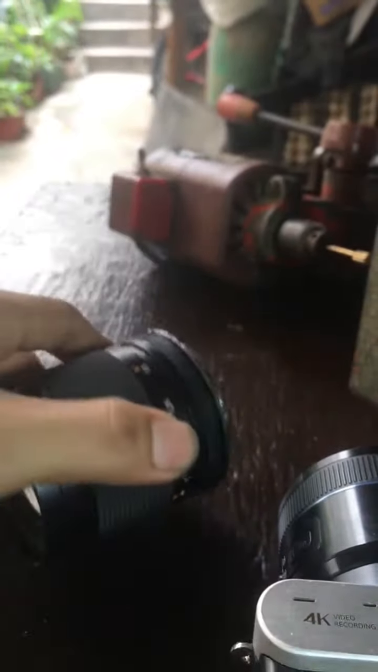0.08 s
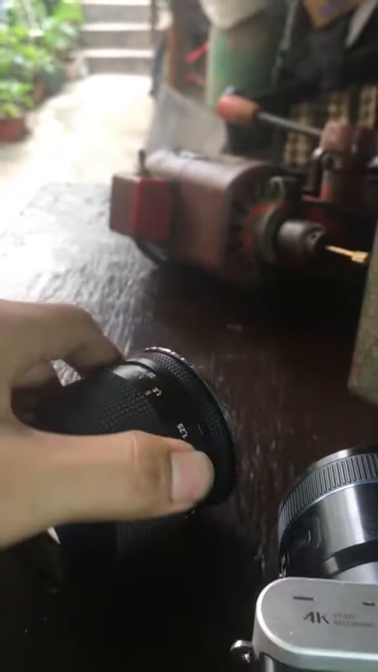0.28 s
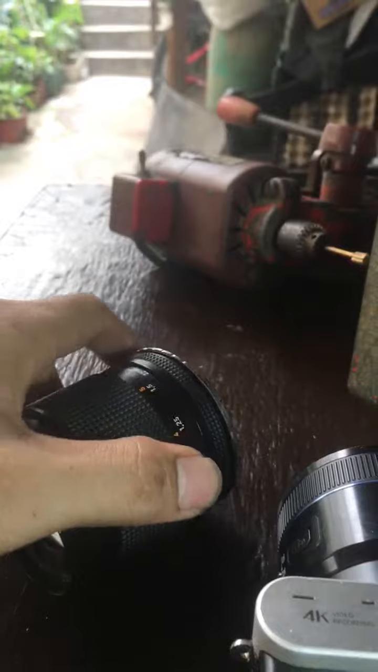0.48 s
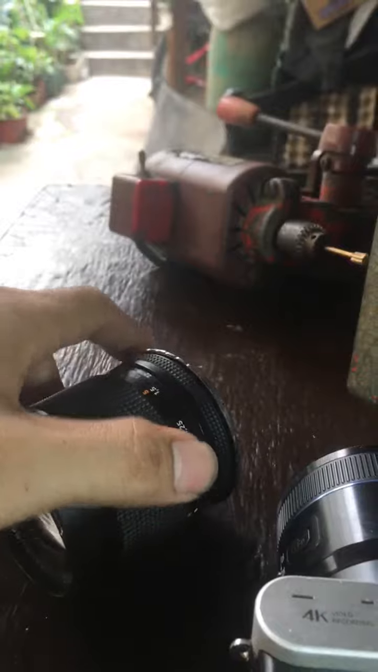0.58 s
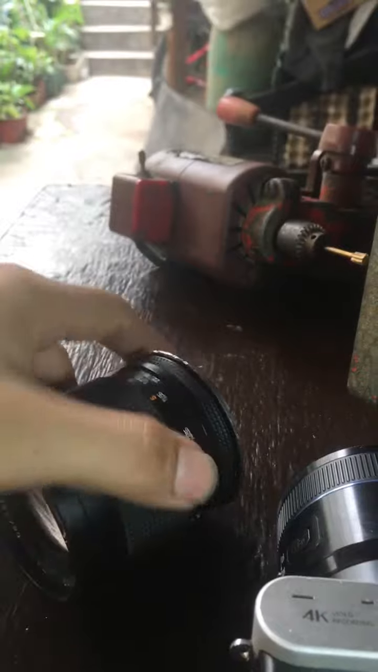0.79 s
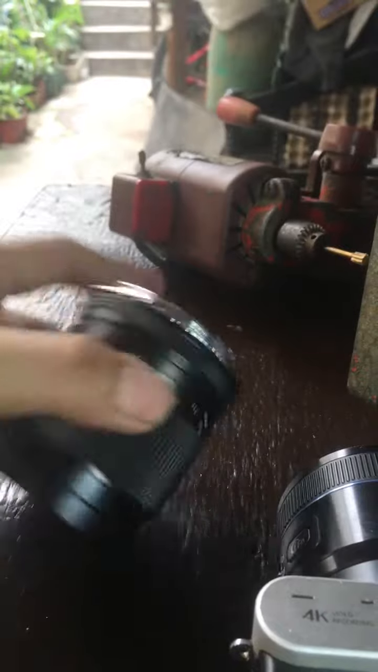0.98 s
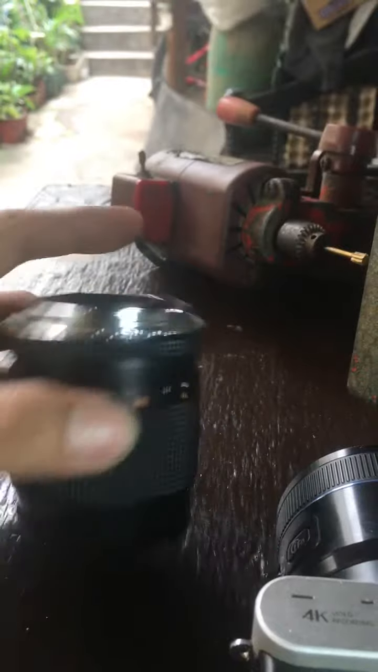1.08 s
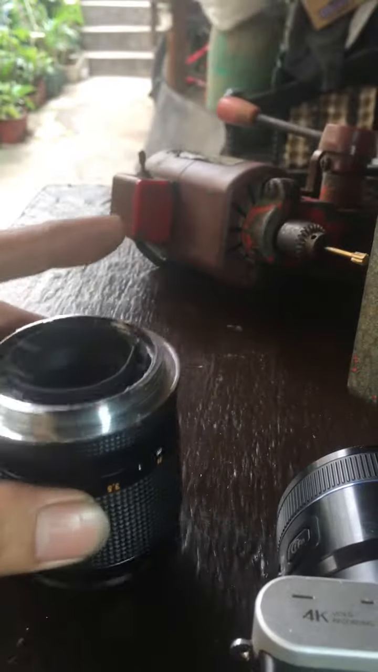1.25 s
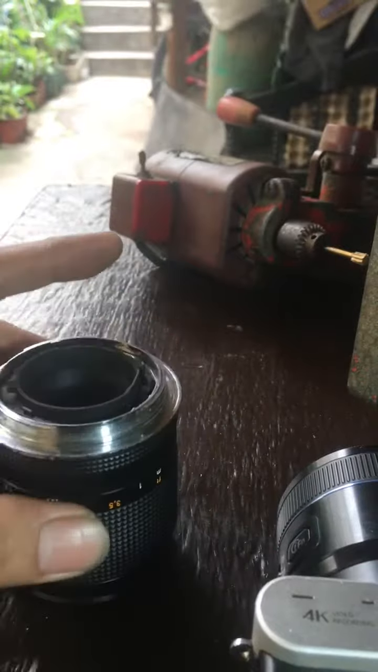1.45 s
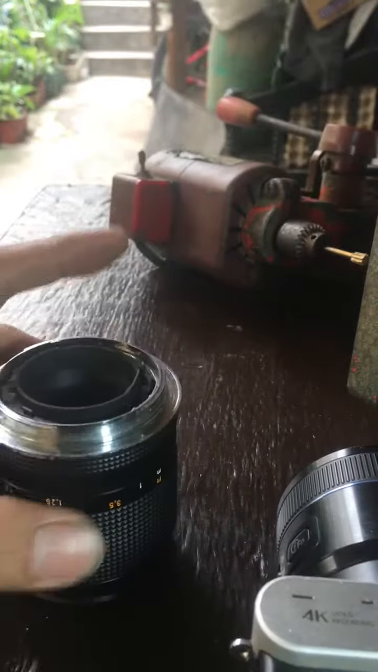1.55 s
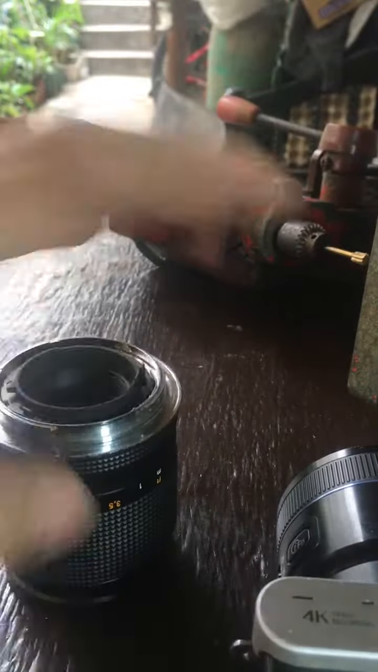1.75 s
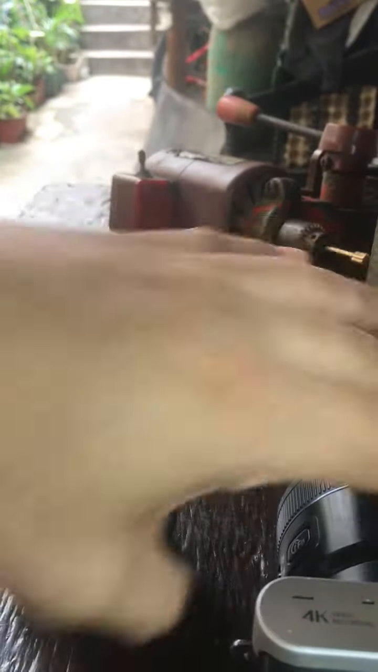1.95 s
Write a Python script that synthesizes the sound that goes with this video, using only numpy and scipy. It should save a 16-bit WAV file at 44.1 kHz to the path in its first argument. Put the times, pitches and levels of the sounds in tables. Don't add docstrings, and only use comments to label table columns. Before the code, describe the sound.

A heavy camera lens knocks down on a thick wooden bench, first farther away, then nearer, with metallic rim clacks and soft hand thumps, over low rumble, hiss and faint pulsing whine, close microphone on the bench.

```python
import sys
import numpy as np
from scipy import signal
from scipy.fft import rfft, irfft
from scipy.io import wavfile
from scipy.ndimage import uniform_filter1d

SR = 44100
rng = np.random.default_rng(int(sys.argv[2]) if len(sys.argv) > 2 else 0)


def wrap_up_sound(samples):
    columns = np.atleast_2d(samples).T
    tamed = np.clip(columns, -1, 1)
    steps = np.round(tamed * 32767).astype(np.int16)
    wavfile.write(sys.argv[1], SR, steps)


def invert_db(x):
    u = np.asarray(x, float) / 20
    return 10 ** u


N = 88200


def read(points, hz):
    f, value = np.transpose(points)
    return np.interp(np.log(hz + 1), np.log(f + 1), value, left=-90, right=-90)


def noise(colour, size, patchy_db=0.):
    hz = np.fft.rfftfreq(size, 1 / SR)
    frames = N // (size // 4) + 5
    real, imaginary, patches = rng.standard_normal((frames, len(hz), 3)).T
    patches = uniform_filter1d(patches, size=9, axis=0)
    patches = uniform_filter1d(patches, size=7, axis=1)
    level_db = read(colour, hz)[:, None] + patchy_db * patches / patches.std()
    spectrum = (real + 1j * imaginary) * invert_db(level_db)
    x = signal.istft(spectrum, nperseg=size, noverlap=size * 3 // 4)[1][:N]
    return x / x.std()


def room():
    # (frequency [Hz], level per Hz [dB])
    rumble_colour = [(20, -21.5), (40, -12), (55, -10), (72, -2), (92, -15.5), (113, -7), (140, -15.5),
                     (190, -22.5)]
    # (frequency [Hz], level per Hz [dB])
    murmur_colour = [(88, -35), (150, -0.5), (367, -7), (401, -15), (438, -2), (485, -10.5), (522, -14.5),
                     (1690, -17), (5000, -40.5), (6500, -71.5), (11000, -120)]
    # (frequency [Hz], level per Hz [dB])
    hiss_colour = [(4000, -4), (4900, -10), (6000, -2.5), (7600, -10.5), (8800, 0), (10200, -10.5),
                   (11500, -3.5), (14000, -9), (15900, -10)]
    rumble = invert_db(-44) * noise(rumble_colour, size=8192)
    murmur = invert_db(-54) * noise(murmur_colour, size=1024, patchy_db=1.5)
    hiss = invert_db(-73) * noise(hiss_colour, size=512, patchy_db=.6)
    return rumble + murmur + hiss


def whine():
    # (multiple of the base pitch [-], level [dB])
    harmonics = [(1, -80), (2, -97), (3, -79.5), (4, -80.5), (5, -85.5)]
    base_hz = 3073
    period_s, pause_s, first_pause_s = .3225, .036, .268
    t = np.arange(N) / SR
    from_pause_s = abs((t - first_pause_s + period_s / 2) % period_s - period_s / 2)
    gate = np.clip((from_pause_s - pause_s / 2) / .003, 0, 1)
    drift = uniform_filter1d(rng.standard_normal(N), size=3000)
    turns = np.cumsum(base_hz * (1 + .0005 * drift / drift.std())) / SR
    buzz = sum(invert_db(db) * np.sin(2 * np.pi * round(k) * turns) for k, db in harmonics)
    return gate * 2 ** .5 * buzz


def thumps():
    # (time [s], level [dB], first pitch [Hz], last pitch [Hz], length [s])
    hand = [
        (0.044, -35, 96, 84, 0.035),
        (0.096, -35, 97, 80.5, 0.028),
        (0.787, -38.5, 83, 80, 0.032),
        (1.342, -36, 49.7, 41.6, 0.051),
        (1.747, -43.5, 243, 226, 0.018),
        (1.765, -34.5, 79, 94, 0.037),
        (1.983, -34, 85, 78, 0.047),
    ]
    firm = [
        (1.9035, -25, 140, 58, .03),
        (1.9275, -24, 86, 76, .036),
        (1.328, -35, 330, 250, .005),
        (1.334, -33, 420, 300, .006),
    ]
    out = np.zeros(N + SR)
    for s, db, first_hz, last_hz, length in [*hand, *firm]:
        u = np.arange(0, 1, 1 / (length * SR))
        hz = last_hz + (first_hz - last_hz) * (1 - u) ** 2
        swell = np.sin(np.pi * u ** .7)
        out[round(s * SR):][:len(u)] -= invert_db(db) * swell * np.sin(2 * np.pi * np.cumsum(hz) / SR)
    return out[:N]


def crackles():
    # (time [s], level [dB])
    ticks = [(0.13, -53.5), (0.2324, -50), (0.4366, -64), (0.5692, -53), (0.5978, -54), (0.6988, -65),
             (0.7445, -54.5), (0.8933, -49.5), (0.9308, -66.5), (1.0515, -55), (1.171, -52.5),
             (1.2141, -53.5), (1.257, -66), (1.3808, -52), (1.534, -51), (1.5623, -53.5), (1.6663, -47.5),
             (1.767, -55.5), (1.9734, -53)]
    out, t = np.zeros(N + 400), np.arange(400) / SR
    for (s, db), grain in zip(ticks, rng.standard_normal((len(ticks), 400))):
        fading_db = np.minimum(db, -55) - 6 - 60 * t / .014
        out[round(s * SR):][:400] += invert_db(fading_db) * grain
    treble = signal.butter(2, 4500, "high", fs=SR, output="sos")
    return signal.sosfilt(treble, out)[:N]


def bench():
    # (pitch [Hz], t60 [s], swing struck far [-], swing struck near [-])
    top = [(72.7, 0.451, 0.092, 0.085), (107.7, 0.206, -0.137, -0.227), (118.5, 0.252, -0.088, -0.084),
           (162.1, 0.153, 0.073, 0.091), (203.3, 0.183, 0.076, 0.139), (212.0, 0.306, 0.047, 0.063),
           (228.8, 0.091, 0.207, 0.157), (251.0, 0.098, -0.108, 0.013), (333.6, 0.072, -0.251, -0.294),
           (353.5, 0.121, 0.257, 0.261), (393.6, 0.107, -0.102, 0.092), (407.7, 0.061, -0.465, -0.716),
           (424.6, 0.23, 0.049, 0.051)]
    apron = [(457.2, 0.118, -0.034, -0.117), (478.6, 0.03, 0.486, 0.411), (551.9, 0.083, 0.012, 0.329),
             (605.9, 0.044, -0.17, -0.372), (773.2, 0.069, -0.024, -0.024), (925.2, 0.02, 0.102, 0.167),
             (1145.0, 0.02, -0.108, -0.212), (1374.1, 0.054, 0.03, 0.013)]
    # (time [s], force [-], hardness [Hz], spot [0 far, 1 near])
    blows = [
        (.22028, 1, 2300, 0),
        (.2282, 1.46, 207, 0),
        (1.37978, 1, 900, 1),
        (1.41601, .256, 473, 1),
    ]
    # (time [s], force [dB], hardness [Hz])
    bumps = [
        (.82, -31, 407),
        (0.22, -29, 890),
        (0.44, -47.5, 1200),
        (1.94, -38, 410),
    ]
    spread = .288
    low_hz, loss_hz = 35, 1900
    size = 2 ** 17
    hz = np.fft.rfftfreq(size, 1 / SR)
    w = 2j * np.pi * hz
    modes = np.array([*top, *apron])
    turn = 2 * np.pi * modes[:, :1]
    decay = np.log(1000) / modes[:, 1:2]
    ring = modes[:, 2:].T @ (turn / (turn ** 2 + (w + decay) ** 2))
    hits = [*blows, *((s, invert_db(db), hard_hz, 0) for s, db, hard_hz in bumps)]
    total = 0
    for s, force, hard_hz, spot in hits:
        pulse = force * np.exp(-w * s) / (1 + 1j * hz / hard_hz) ** 2
        total = total + ring[int(spot)] * pulse
    band = -(hz / loss_hz) ** 4 - (low_hz / (hz + 1)) ** 4
    path = np.exp(-1j * spread * np.sqrt(hz) + band)
    return irfft(total * SR * path, size)[:N]


def clacks():
    # (time [s], ring level [dB], tick level [dB], tick pitch [Hz])
    contacts = [
        (0.2216, -36, -50.5, 4240),
        (.2328, -44, -50.5, 6000),
        (1.3287, -69, -55.5, 1300),
        (1.3355, -61, -48, 1300),
        (1.3815, -41.5, -53.5, 5560),
        (1.3807, -56.5, -51, 4500),
        (1.3826, -68, -47, 3340),
        (1.4178, -56, -59.5, 2300),
        (1.996, -78, -64, 5000),
    ]
    # (frequency [Hz], level per Hz [dB])
    colour = [(400, -12), (560, -3.5), (740, -24), (950, -1), (1400, -10), (2250, -13.5), (3000, -38),
              (9000, -50)]
    # (band centre [Hz], t60 [s])
    band_t60 = [(520, 0.48), (1000, 0.11), (1500, 0.14), (2500, 0.067), (4000, 0.019), (7000, .01)]
    rise_s = .00094
    snap_db, snap_s, tick_s = 13, .0022, .00045
    out, t = np.zeros(N + 8192), np.arange(8192) / SR
    hz = np.fft.rfftfreq(8192, 1 / SR)
    octave = np.log2(hz / 1000 + 1e-3)
    snap = np.minimum(t / rise_s, 1) * (1 + invert_db(snap_db) * np.exp(-(t / snap_s) ** 2))
    for s, db, tick_db, tick_hz in contacts:
        spectrum = rfft(rng.standard_normal(8192)) * invert_db(read(colour, hz))
        spectrum /= irfft(spectrum).std()
        tick_shape = np.exp(-((t - 2 * tick_s) / tick_s) ** 2)
        sound = invert_db(tick_db) * tick_shape * np.sin(2 * np.pi * tick_hz * t)
        for f, t60 in band_t60:
            share = np.exp(-((octave - np.log2(f / 1000)) / 0.48) ** 2)
            sound = sound + irfft(spectrum * share) * invert_db(db - 60 * t / t60) * snap
        out[round(s * SR):][:8192] += sound
    return out[:N]


def duck():
    t = np.arange(N) / SR
    dip_db = sum(-4.5 * (t > s + .02) * np.exp(-abs(t - s) / .22) for s in (.2211, 1.3803))
    return invert_db(dip_db)


def rustle():
    # (start [s], length [s], level [dB])
    start, length, db = (.232, .057, -67)
    # (frequency [Hz], level per Hz [dB])
    colour = [(2500, -3), (6000, -3), (9000, -3), (13000, 0), (15700, -3)]
    u = (np.arange(N) / SR - start) / length
    fade = np.clip(np.minimum(u, 1 - u) * 6, 0, 1)
    return invert_db(db) * fade * noise(colour, size=256, patchy_db=1.5)


def scene():
    background = room() + whine() + crackles()
    contacts = thumps() + bench() + clacks() + rustle()
    return (contacts + background * duck())[None]


def top_cut(x):
    return signal.sosfilt(signal.butter(12, 15770, fs=SR, output="sos"), x)


def record(dry):
    return top_cut(dry)


dry = scene()
out = record(dry)
wrap_up_sound(out)
```